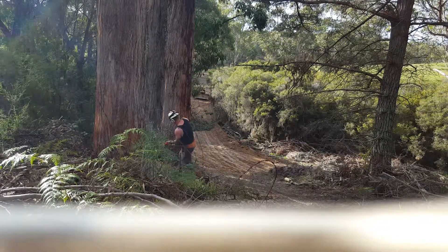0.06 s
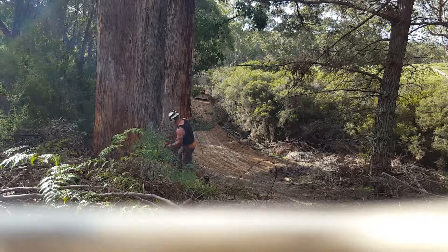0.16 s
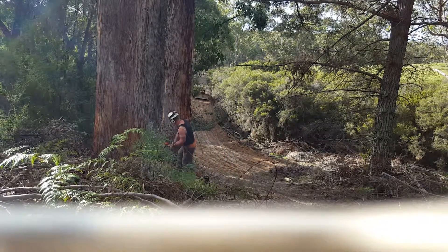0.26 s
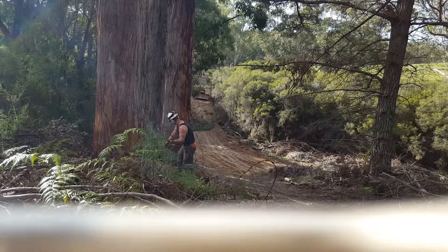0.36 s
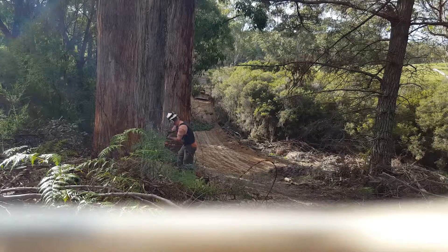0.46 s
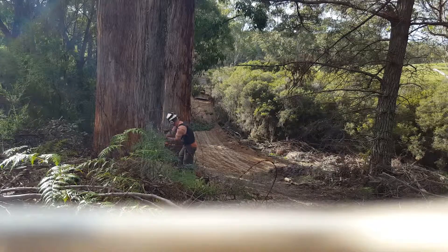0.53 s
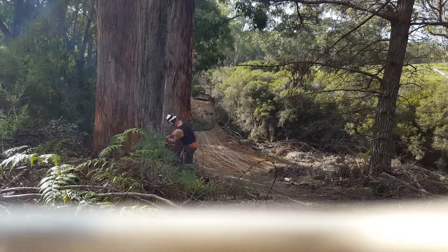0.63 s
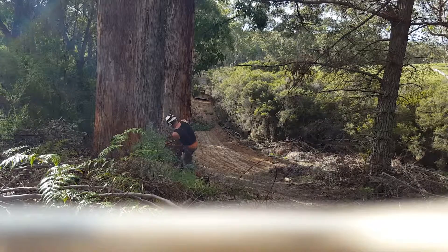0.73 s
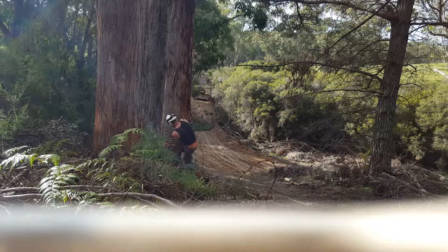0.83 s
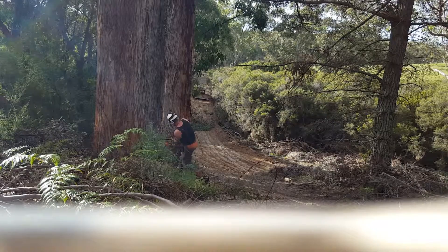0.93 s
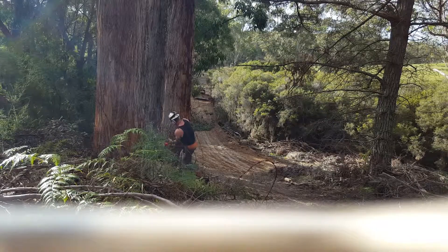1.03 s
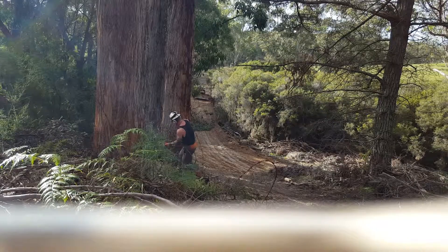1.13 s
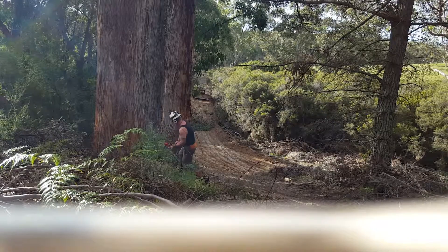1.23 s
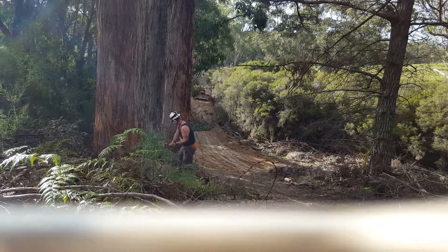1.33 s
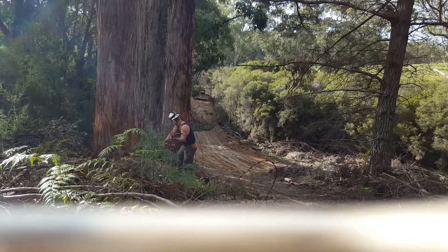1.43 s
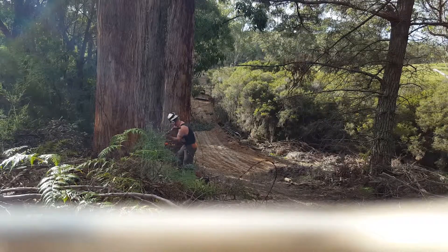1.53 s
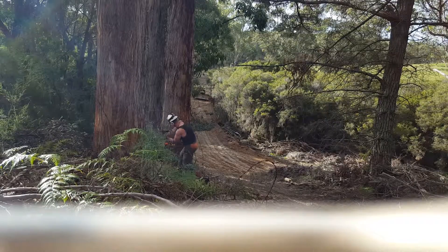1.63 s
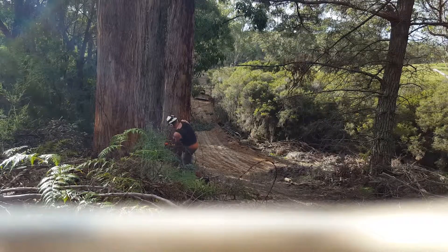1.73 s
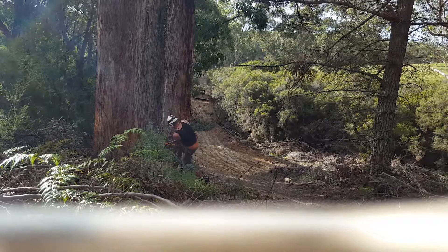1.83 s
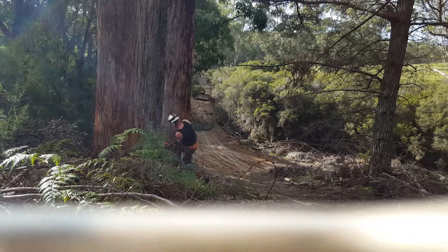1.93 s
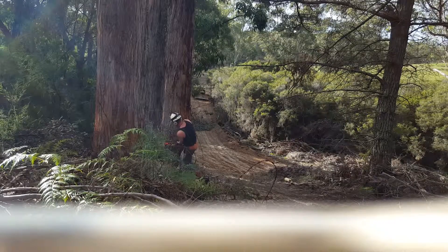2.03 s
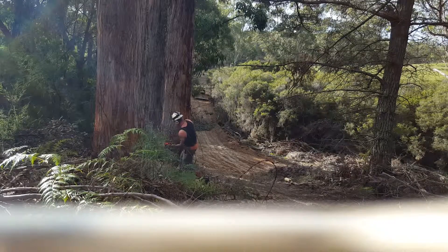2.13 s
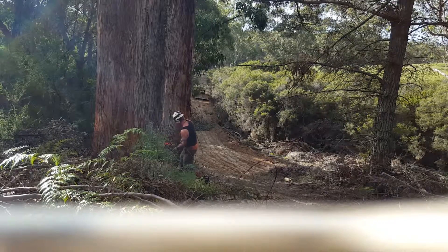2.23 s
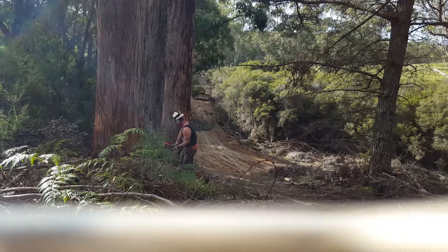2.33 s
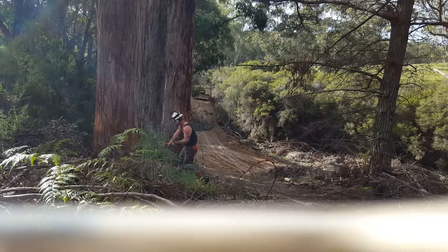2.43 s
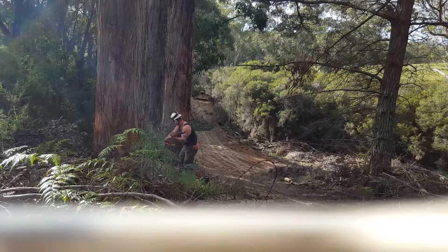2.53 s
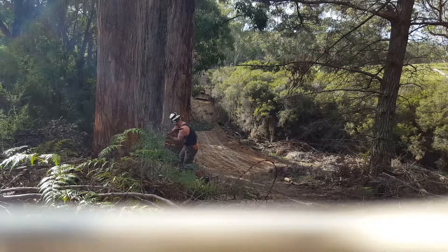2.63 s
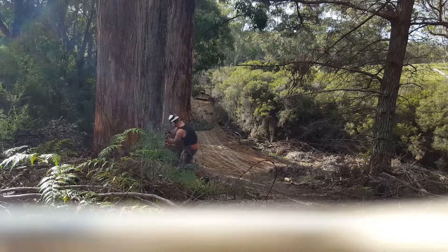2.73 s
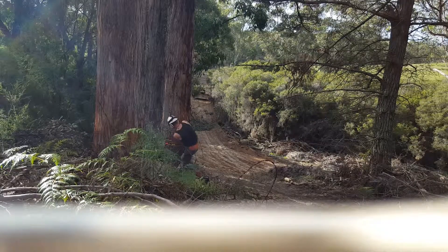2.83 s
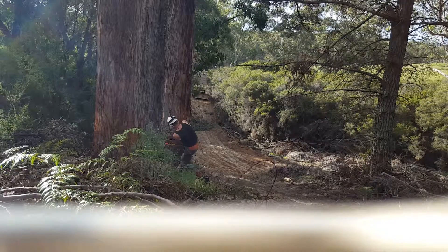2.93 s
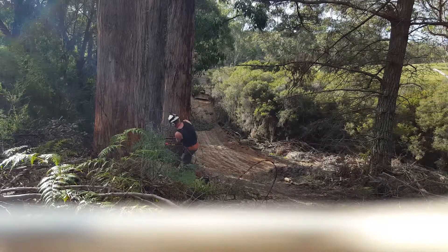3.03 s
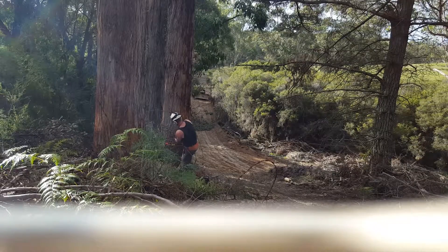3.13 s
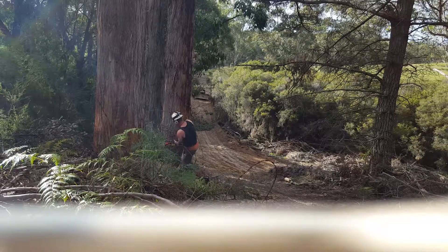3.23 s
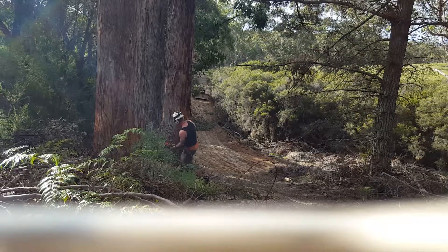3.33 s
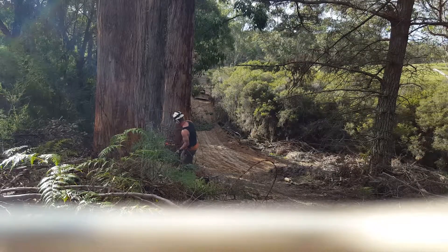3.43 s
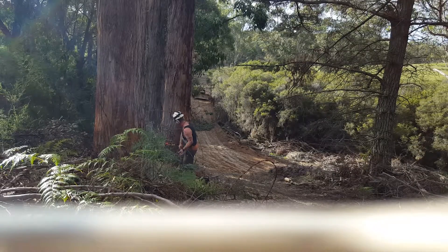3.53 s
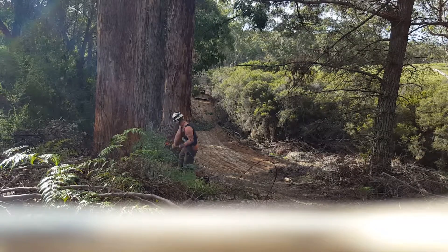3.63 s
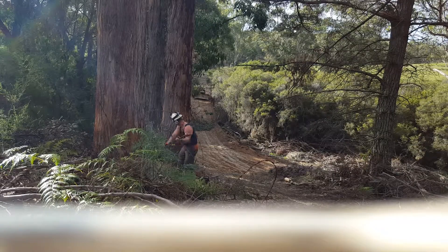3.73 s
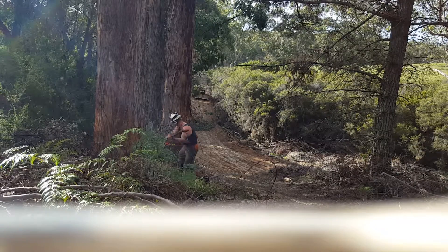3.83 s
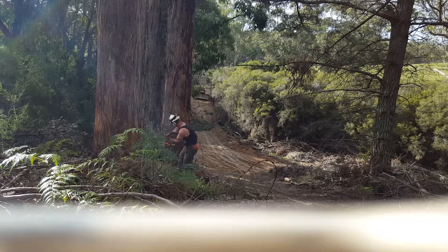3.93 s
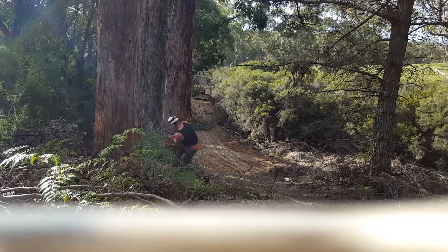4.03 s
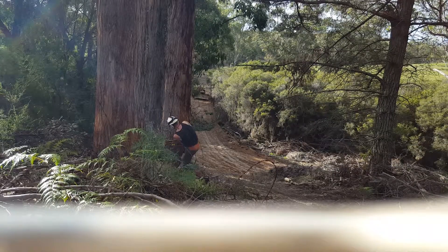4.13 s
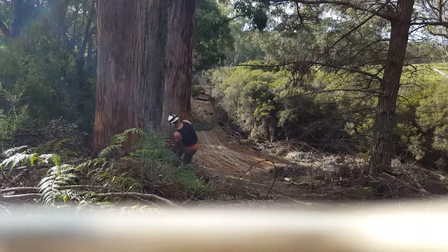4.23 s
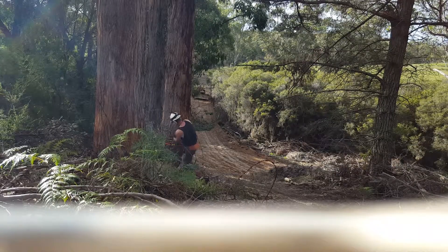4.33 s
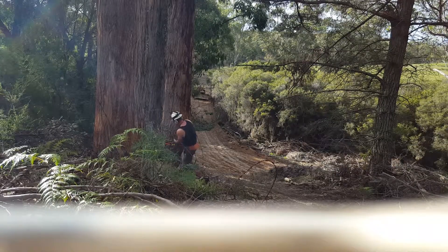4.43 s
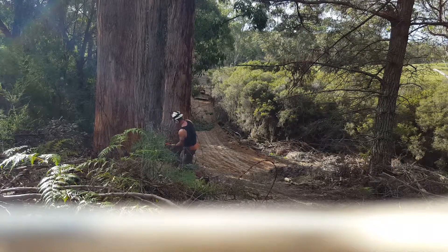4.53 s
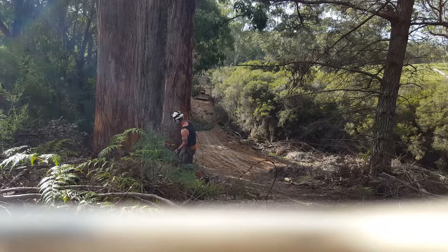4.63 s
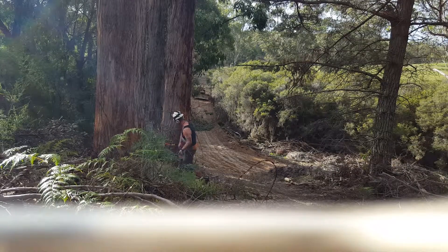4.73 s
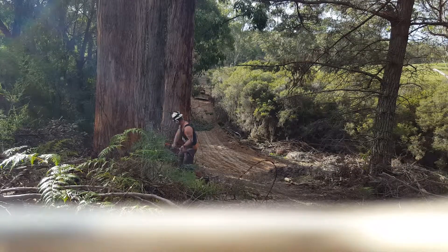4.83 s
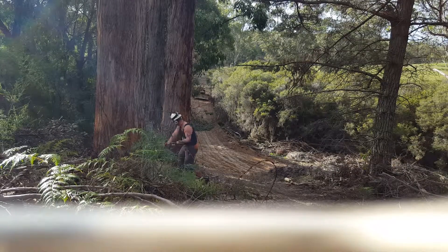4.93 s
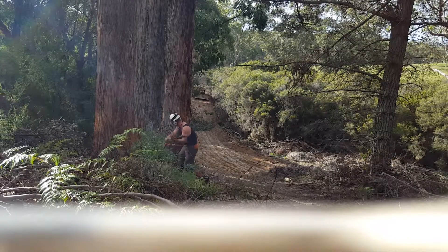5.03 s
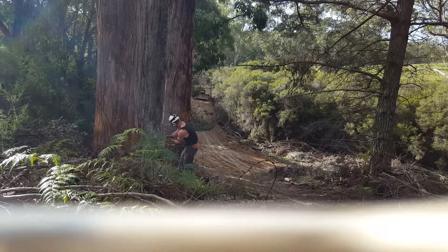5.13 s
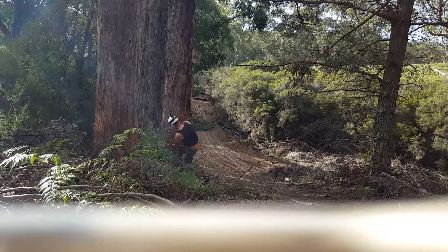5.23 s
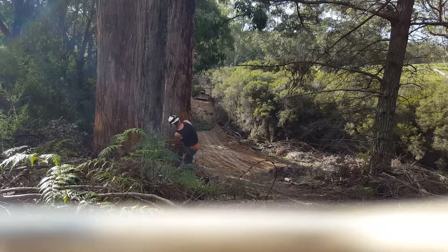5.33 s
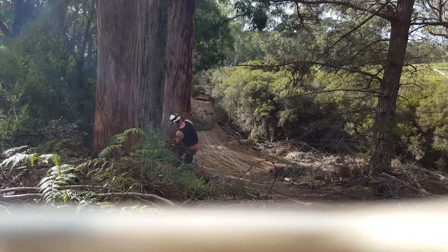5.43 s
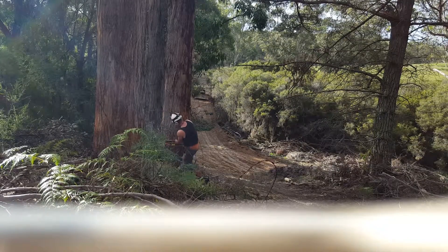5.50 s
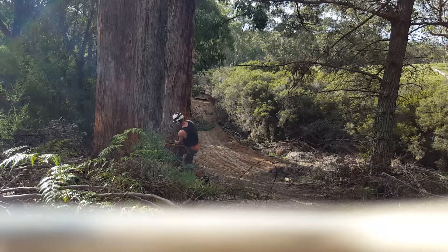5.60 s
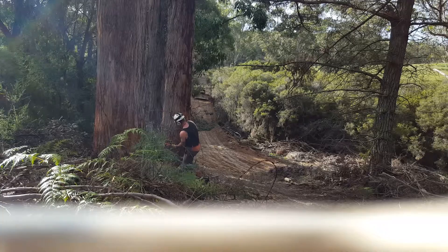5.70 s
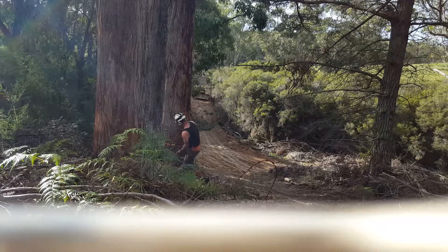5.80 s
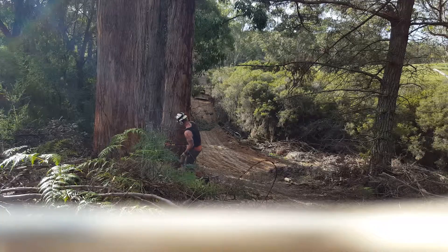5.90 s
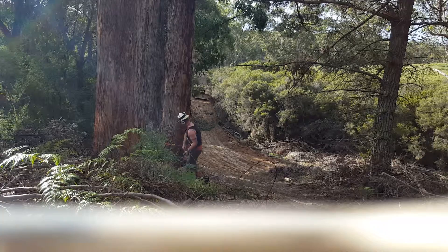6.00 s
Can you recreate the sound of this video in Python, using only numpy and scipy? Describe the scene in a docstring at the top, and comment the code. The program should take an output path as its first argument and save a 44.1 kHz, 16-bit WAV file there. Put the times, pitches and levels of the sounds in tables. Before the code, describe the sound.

Slow, sharp hammer blows on a metal wedge in a tree trunk echo through the bush over a faint idling diesel engine.

```python
"""A feller hammers a wedge into a big tree while an engine, by its beat a six-cylinder diesel, idles nearby.
We open on the tail of a blow; just before one second the next lands as a dull, wooden knock.
From about two seconds four more follow: each cracks, rings the wedge, booms in the trunk and
scatters through the bush. The recorder clips on the blows and turns its gain down after them.
In the gaps leaves rustle and, in the second half, twigs snap."""
import sys
import numpy as np
from scipy import signal
from scipy.fft import rfft, irfft, next_fast_len
from scipy.io import wavfile
from scipy.ndimage import uniform_filter1d, minimum_filter1d

SR = 44100
rng = np.random.default_rng(int(sys.argv[2]) if len(sys.argv) > 2 else 0)


def bounce(signal):
    """Save signal as a 16-bit WAV file at the path given by the first command-line argument."""
    frames = np.transpose(np.atleast_2d(signal))
    limited = np.clip(frames, -1, 1)
    pcm = np.round(limited * 32767).astype(np.int16)
    wavfile.write(sys.argv[1], SR, pcm)


N = 267246

# The hammer hits. Each row: start in seconds, crack level in dB, brightness in dB per octave,
# then the levels of wedge ring, trunk boom and bush scatter in dB.
HAMMER_HITS = [(-0.21, 11, 10, -9, -22, -22), (1.8781, 1.5, 1.5, -15.5, -21.5, -23),
               (2.9811, -9.5, 2.5, -9.5, -17.5, -21), (4.2180, -3, .5, -1.5, -16.5, -21),
               (5.3913, 0, -0.5, -1, -20, -21)]

def hammering(contact_s=0.00056, build_s=0.0088, build_doubles_db=13):
    """Steel cracks on the wedge, the wedge rings briefly, the trunk booms, the bush answers."""
    out, t = np.zeros((2, N)), np.arange(SR) / SR
    for start, crack_db, bright_db, ring_db, boom_db, bush_db in HAMMER_HITS:
        strike = undb(crack_db) * crack(t, bright_db) + undb(ring_db) * wedge_ring(t)
        strike *= 1 - np.exp(-t / contact_s)
        boom = undb(boom_db) * trunk_boom(t)
        bush_tilt_db = -0.82 + 0.34 * bright_db  # duller than the crack, partly following it
        swell_s = build_s * 2 ** (-crack_db / build_doubles_db)  # a weaker crack blooms more slowly
        scatter = undb(bush_db) * bush_scatter(t, bush_tilt_db, swell_s)
        add(out, start, from_left(strike + boom) + scatter)
    return out


# The colour of the crack. Each row: frequency in Hz, relative level in dB.
CRACK_EQ = [(100, -30.5), (400, -16), (800, -8), (1200, -2.5), (1900, -5), (2800, -8), (4300, -13.5),
            (6000, -25), (12000, -30), (16000, -43)]

def crack(t, bright_db, t60=0.014):
    """Hammer meets wedge: a flash of noise with the same energy at any brightness."""
    envelope = fade(t, t60)
    flash = noise(CRACK_EQ, size=len(t), tilt_db=bright_db)[0] * envelope
    return flash * np.linalg.norm(envelope) / np.linalg.norm(flash)


# The wedge's clank. Each row: pitch in Hz, level in dB, 60 dB decay time in seconds.
WEDGE_MODES = [(561.4, -16.5, 0.096), (952, -13, 0.034), (1203, 0.5, .024), (1387, -4, 0.007),
               (1584, -10, 0.028), (2267, -11, 0.027), (2735, -7.5, 0.013), (3060, -6.5, 0.012),
               (4300, -7.5, 0.01)]

def wedge_ring(t):
    """The struck wedge rings briefly in its cut."""
    return ring(WEDGE_MODES, t)


# The weight under each hit. Each row: pitch in Hz, level in dB, 60 dB decay time in seconds.
TRUNK_MODES = [(87, -1.5, 0.29), (127.8, -5, 0.3), (171.3, -5, 0.26), (213.6, 3.5, .17), (272.6, 1, 0.14),
               (346.4, -6.5, 0.16), (516, -13, 0.2), (581, -1, 0.11)]

def trunk_boom(t, build_s=0.015):
    """The trunk's low modes swell into a boom."""
    return ring(TRUNK_MODES, t, detune=0.017) * (1 - np.exp(-(t / build_s) ** 2))


# The knock's balance: tick, body and rattle levels in dB.
KNOCK_MIX = (-12, -10, -31)
# Its dry tick and hollow body. Each row: pitch in Hz, level in dB, 60 dB decay time in seconds.
TICK_MODES = [(730, 1, 0.01), (1006, -2, 0.014), (1224, -1.5, 0.024), (2186, -3, 0.02), (2670, -12, 0.025)]
BODY_MODES = [(132, -1, 0.049), (190.5, -14, 0.33), (226, -17, 0.33), (272, -1.5, 0.041),
              (341.7, -25.5, 0.35), (562, -20, 0.095)]
# Its dark rattle. Each row: frequency in Hz, relative level in dB.
RATTLE_EQ = [(100, 9.5), (500, -4.5), (1000, -5), (2500, -23), (6000, -31), (16000, -47)]

def dull_knock(start=0.8432, body_delay_s=0.00256, rattle_t60=0.47, snap_db=-22, snap_t60=0.021):
    """A blow that does not ring the steel: a dry tick, then a hollow wooden note."""
    out, t = np.zeros((2, N)), np.arange(SR) / SR
    tick_db, body_db, rattle_db = KNOCK_MIX
    snap = undb(snap_db) * noise(CRACK_EQ, size=SR, tilt_db=-0.9)[0] * fade(t, snap_t60)
    add(out, start, from_left(undb(tick_db) * ring(TICK_MODES, t) + snap))
    add(out, start + body_delay_s, from_left(undb(body_db) * ring(BODY_MODES, t)))
    add(out, start, undb(rattle_db) * noise(RATTLE_EQ, size=SR) * fade(t, rattle_t60))
    return out


# The colour of the bush's reverb. Each row: frequency in Hz, relative level in dB.
SCATTER_EQ = [(60, 0.5), (200, 15), (380, 3), (650, 1), (1150, -0.5), (1700, -8.5), (2700, -5), (4500, -12),
              (8000, -15.5), (12000, -23), (16000, -34.5)]
# Its length. Each row: band centre in Hz, 60 dB decay time in seconds.
SCATTER_DECAY = [(100, 0.32), (300, 0.31), (900, 0.74), (2500, 0.573), (6000, 0.41), (14000, 0.41)]

def bush_scatter(t, tilt_db, build_s, tree_s=0.034, tree_db=-1, far_db=-26, far_hz=2300):
    """Scatter from stems and leaves builds and flares off a big tree; steel and a far tail linger."""
    spectrum = rfft(noise(SCATTER_EQ, size=len(t), tilt_db=tilt_db, wide_hz=692.4))
    hz = np.arange(spectrum.shape[1]) * SR / len(t)
    flare = 1 + undb(tree_db) * (t > tree_s) * fade(abs(t - tree_s), t60=0.058)
    out = steel_shimmer(t, hz, tilt_db)
    for centre, t60 in SCATTER_DECAY:
        band = lookup([(f, f == centre) for f, _ in SCATTER_DECAY], hz)
        far_tail = undb(far_db) * fade(t, t60=1.6) / (1 + (centre / far_hz) ** 2)
        out += irfft(spectrum * band, len(t)) * np.hypot(fade(t, t60) * flare, far_tail)
    return out * (1 - np.exp(-(t / build_s) ** 2))


# The metallic sheen in the tail. Each row: centre in Hz, width in Hz, relative level in dB.
STEEL_PEAKS = [(1215, 170, -6.5), (1760, 110, -16.5), (3290, 150, -17), (4450, 500, -20), (5170, 88, -21.5),
               (5976, 800, -26), (6740, 130, -26), (8130, 300, -32.5)]

def steel_shimmer(t, hz, tilt_db, level_db=-12, t60=0.64):
    """The steel's ring, smeared by the trees; each blow stirs the modes differently."""
    peaks = 0
    for centre, width, db in STEEL_PEAKS:
        peak_db = db + tilt_db * np.log2(centre / 1500) + 1.8 * rng.standard_normal()
        peaks += undb(peak_db) / (1 + (2 * (hz - centre) / width) ** 2)
    white = rng.standard_normal((2, len(t)))
    return undb(level_db) * unit(irfft(peaks * rfft(white), len(t))) * fade(t, t60)


# The exhaust's drone. Each row: multiple of the engine's cycle rate, level in dB.
EXHAUST_HARMONICS = [(6, -54.5), (9, -60), (11, -67.5), (12, -48), (13, -59.5), (14, -60), (16, -60.5),
                     (18, -58), (24, -60.5), (30, -74), (34, -72.5), (64, -65.5), (66, -73.5)]
# The fan's hum. Each row: multiple of the fan's pitch, level in dB.
FAN_HARMONICS = [(1, -48), (2, -70), (3, -68)]
# Diesel clatter and the rumble beneath it. Each row: frequency in Hz, relative level in dB.
CLATTER_EQ = [(100, -6), (170, -3.5), (280, -8), (370, -2.5), (440, 0), (530, -1.5), (750, -4.5), (1000, 2),
              (1320, -11), (1800, -9.5), (3000, -16), (5400, -29), (9000, -36.5), (16000, -43.5)]
RUMBLE_EQ = [(20, -30.5), (45, -18), (70, 4.5), (95, 8.5), (130, 4), (180, -6.5), (300, -7.5), (600, -50.5)]

def diesel_idle(cycle_hz=6.722, fan_hz=104.6, cylinders=6, drift=0.00196, pulse_depth=0.14):
    """Exhaust beats against the fan's hum; clatter pulses at each firing and partly repeats each cycle."""
    cycles = np.cumsum(cycle_hz * (1 + drift * wander(6))) / SR
    fan_turns = np.cumsum(fan_hz * (1 + drift * wander(5.19))) / SR
    firings = np.cos(2 * np.pi * cylinders * cycles)
    pulsing = unit(1 + pulse_depth * firings * undb(2 * wander(40)))
    loose = undb(-53) * noise(CLATTER_EQ, wide_hz=1144)
    one_cycle = noise(CLATTER_EQ, size=int(SR / cycle_hz), tilt_db=-3.0)
    position = np.linspace(0, 1, one_cycle.shape[1])
    repeating = undb(-58) * np.array([np.interp(cycles % 1, position, side) for side in one_cycle])
    tones = from_left(hum(cycles, EXHAUST_HARMONICS) + hum(fan_turns, FAN_HARMONICS))
    rumble = undb(-53) * noise(RUMBLE_EQ, wide_hz=600)
    return tones + (loose + repeating) * pulsing + rumble


# Leaf rustles. Each row: start in seconds, level in dB.
LEAF_RUSTLES = [(0.19, -50), (1.579, -63), (3.226, -48)]
# Twig snaps. Each row: start in seconds, level in dB, centre in Hz.
TWIG_SNAPS = [(3.34, -42, 2600), (3.953, -57.5, 7000), (4.591, -60, 4970), (5.125, -53, 3950),
              (5.551, -64, 8130)]

def undergrowth():
    """Leaves rustle in soft swells; twigs snap in short, wide clicks."""
    out = np.zeros((2, N))
    for start, db in LEAF_RUSTLES:
        add(out, start, undb(db) * burst(hz=1710, length_s=0.22, skirt_db=-18))
    for start, db, hz in TWIG_SNAPS:
        add(out, start, undb(db) * burst(hz, length_s=0.0037, skirt_db=-17))
    return out


# The airy bed. Each row: frequency in Hz, relative level in dB.
HISS_EQ = [(1000, 12), (4000, 5), (6000, -1), (7000, -13), (8300, 1), (10000, -7.5), (14000, -1),
           (16000, -13)]

def leaf_hiss(level_db=-69):
    """A faint, steady hiss of leaves."""
    return undb(level_db) * noise(HISS_EQ)


# The lean of the stereo image. Each row: frequency in Hz, level of right over left in dB.
STEREO_LEAN = [(600, 1.38), (1200, 5.5), (2000, 3), (3000, 1), (5000, 0.2), (8000, -7), (13000, 0.5)]

def from_left(x, lag_s=6.2e-5):
    """Direct sound reaches the left microphone port first, and each port has its own colour."""
    size = next_fast_len(len(x) + SR // 10)
    hz = np.arange(size // 2 + 1) * SR / size
    lean = undb(lookup(STEREO_LEAN, hz) / 2)
    ports = np.array([1 / lean, lean * np.exp(-2j * np.pi * hz * lag_s)])
    return irfft(rfft(x, size) * ports, size)[:, :len(x)]


def ring(modes, t, detune=0.031):
    """Damped modes, slightly detuned on every strike."""
    out = 0
    for k, (hz, db, t60) in enumerate(modes):
        pitch = hz * (1 + detune * (2 * rng.random() - 1))
        out += (-1) ** k * undb(db) * fade(t, t60) * np.sin(2 * np.pi * pitch * t)
    return out


def hum(turns, harmonics, waver_db=0.43):
    """Harmonics of a turning shaft, each wavering in level."""
    out = 0
    for multiple, db in harmonics:
        gain = undb(db + waver_db * wander(8.3)) * np.sqrt(2)
        out += gain * np.sin(2 * np.pi * (multiple * turns + rng.random()))
    return out


def burst(hz, length_s, skirt_db):
    """A rounded swell of noise around hz, at skirt_db one octave to either side."""
    swell = np.sqrt(np.hanning(int(length_s * SR)))
    eq = [(hz * 2. ** octave, skirt_db * abs(octave) ** 0.88) for octave in np.arange(-3, 4)]
    return noise(eq, size=SR)[:, :len(swell)] * swell


def noise(eq, size=N, tilt_db=0, wide_hz=900):
    """Coloured stereo noise of rms 1: centred below wide_hz, wide above."""
    hz = np.arange(size // 2 + 1) * SR / size + 1
    gain = undb(lookup(eq, hz) + tilt_db * np.log2(hz / 1500))
    mid, side = np.exp(2j * np.pi * rng.random((2, len(hz))))
    side = side / np.sqrt(1 + (wide_hz / hz) ** 4)
    return unit(irfft(np.array([mid + side, mid - side]) * gain, size))


def wander(rate_hz):
    """Smooth random movement of rms 1."""
    span = int(SR / rate_hz)
    steps = np.repeat(rng.standard_normal(N // span + 1), span)
    return unit(uniform_filter1d(uniform_filter1d(steps, span), span)[:N])


def fade(t, t60):
    """Exponential decay by 60 dB in t60 seconds."""
    return np.exp(-np.log(1000) * t / t60)


def lookup(points, hz):
    """Read (Hz, value) points on a log-frequency axis."""
    freqs, values = np.transpose(points)
    return np.interp(np.log(hz + 1), np.log(freqs), values)


def undb(db):
    """Decibels to gain."""
    return 10 ** (np.asarray(db) / 20)


def unit(x):
    """Scale to rms 1."""
    return x / np.sqrt(np.mean(x ** 2))


def add(out, start, x):
    """Mix x into out at start seconds; what falls before zero is dropped."""
    i = int(start * SR)
    x, i = x[:, max(-i, 0):], max(i, 0)
    out[:, i:i + x.shape[1]] += x[:, :N - i]


def scene():
    """The idling engine, the blows and the undergrowth over a faint hiss of leaves."""
    return diesel_idle() + hammering() + dull_knock() + undergrowth() + leaf_hiss()


def record(dry, threshold_db=-11.0, sense_s=0.0059, hold_s=0.59, slew_s=0.26, slope=2.17, top_hz=16000):
    """Gain control sinks after loud peaks, holds and creeps back; the peaks clip; the top is cut."""
    power = uniform_filter1d(np.mean(dry ** 2, axis=0), int(sense_s * SR))
    wanted_db = -slope * np.maximum(10 * np.log10(np.abs(power) + 1e-12) - threshold_db, 0)
    hold, step = int(hold_s * SR), 1 / (slew_s * SR)
    held_db = minimum_filter1d(wanted_db, hold, origin=(hold - 1) // 2)
    ducked = dry * undb(signal.lfilter([step], [1, step - 1], held_db))
    lowpass = signal.ellip(8, .2, 80, top_hz, fs=SR, output="sos")
    return signal.sosfilt(lowpass, np.clip(ducked, -1, 1))


dry = scene()
out = record(dry)
bounce(out)
```